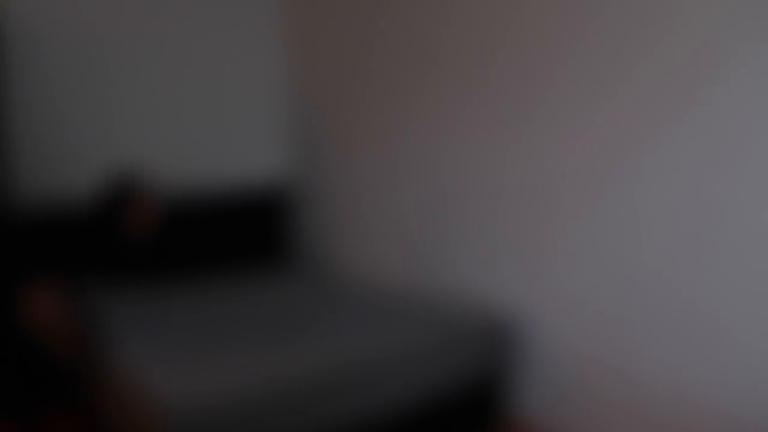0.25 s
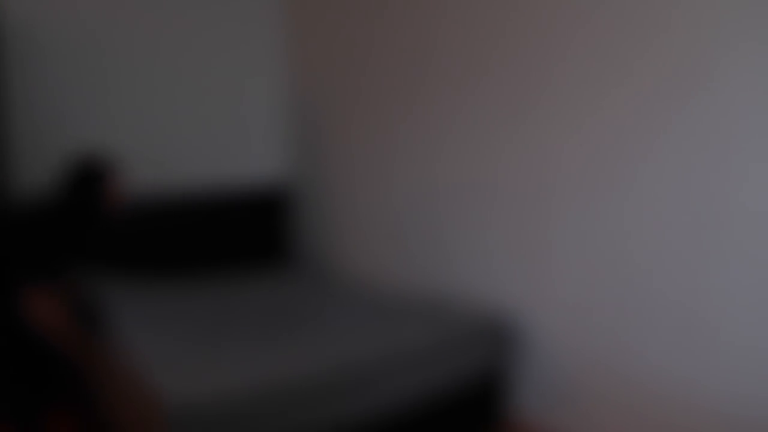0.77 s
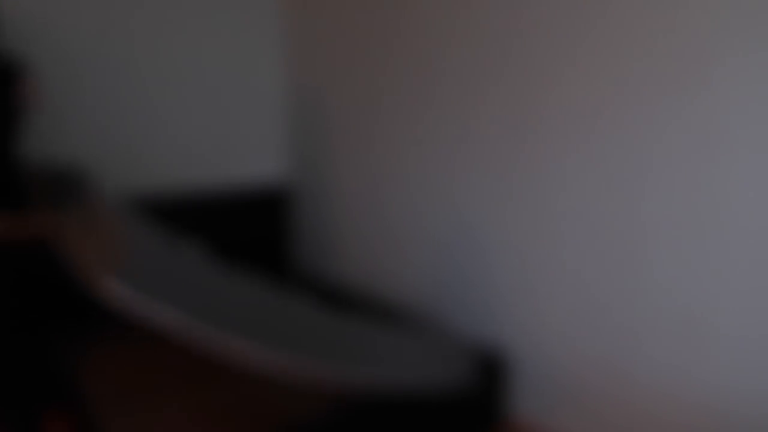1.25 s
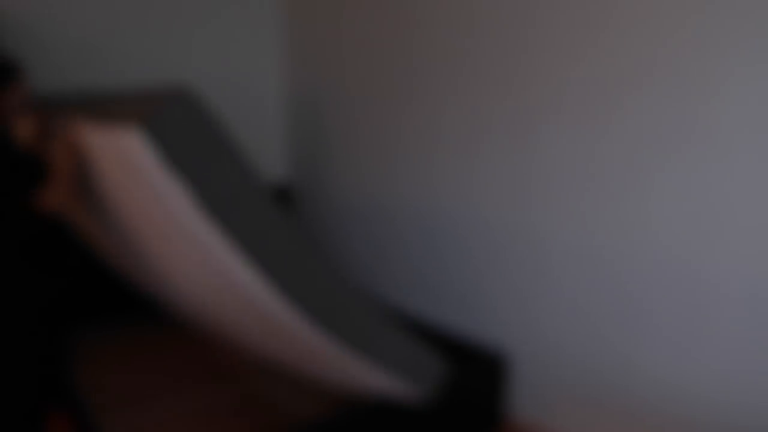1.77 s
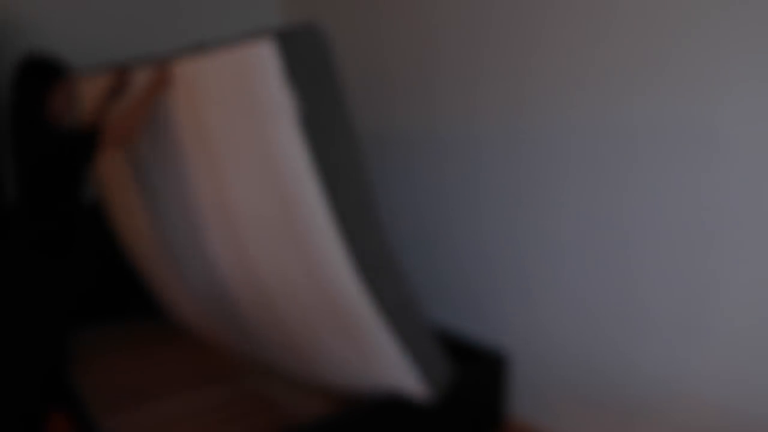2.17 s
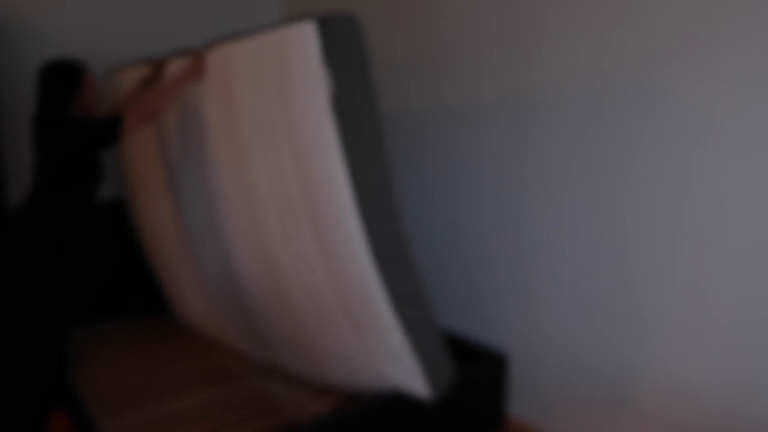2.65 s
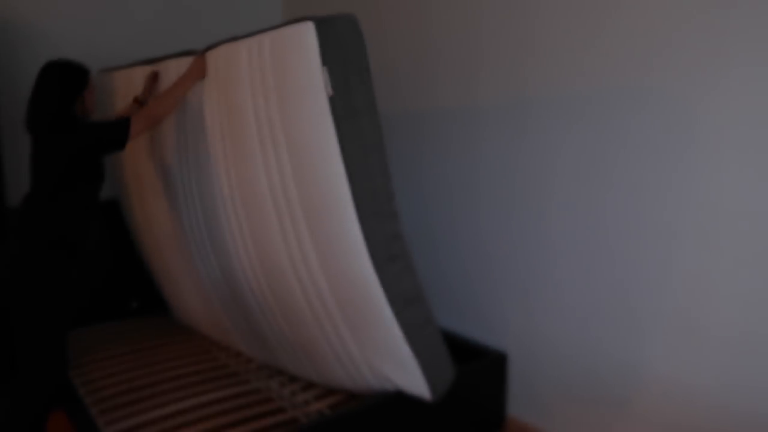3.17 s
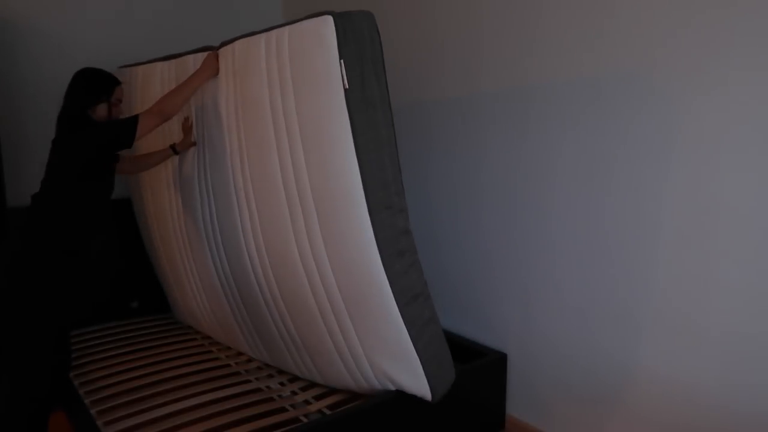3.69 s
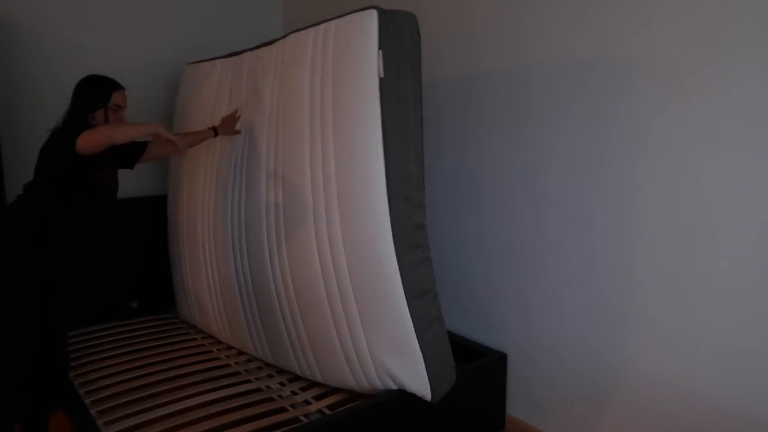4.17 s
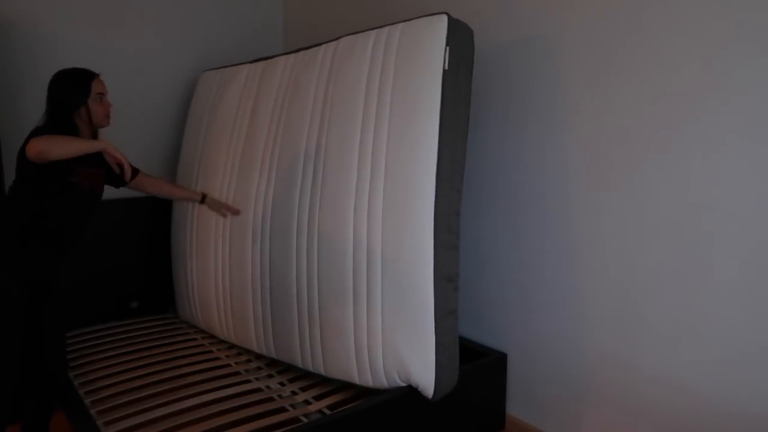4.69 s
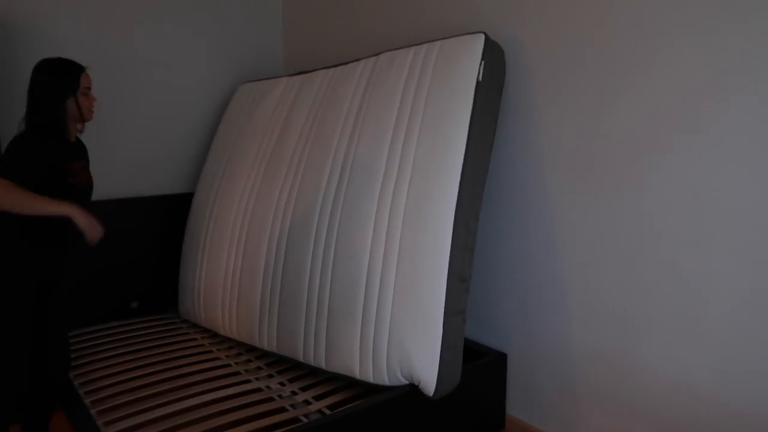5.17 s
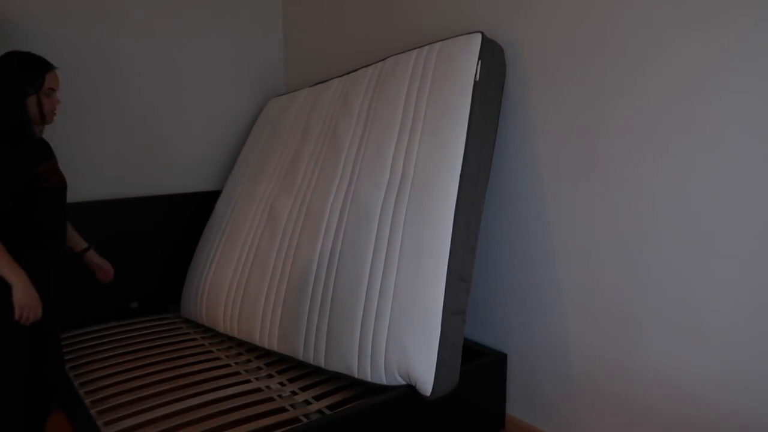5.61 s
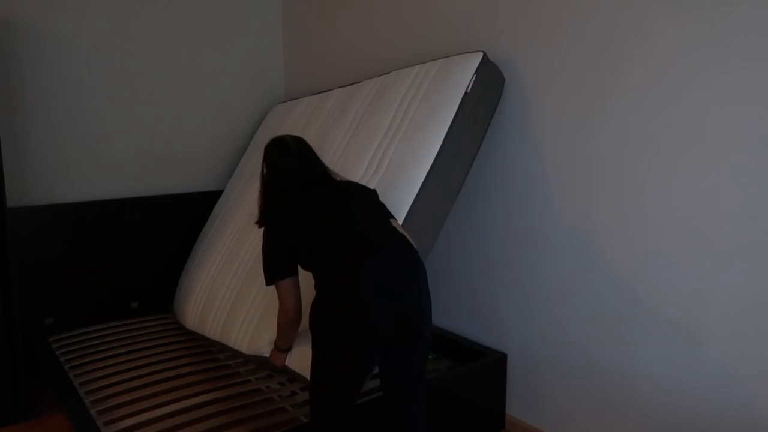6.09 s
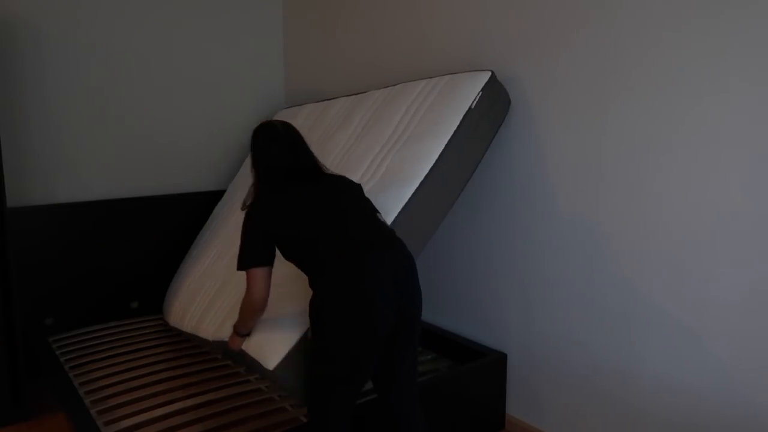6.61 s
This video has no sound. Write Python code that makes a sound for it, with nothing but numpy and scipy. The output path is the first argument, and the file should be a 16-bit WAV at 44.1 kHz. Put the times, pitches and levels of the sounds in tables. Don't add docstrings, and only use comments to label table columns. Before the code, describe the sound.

A mattress is hauled up off a slatted wooden bed, cover rustling, slats clattering loudly, springs pinging faintly, then it slides and tips in a small room.

```python
import sys
import numpy as np
from scipy import signal
from scipy.fft import rfft, irfft
from scipy.io import wavfile

SR = 44100
rng = np.random.default_rng(int(sys.argv[2]) if len(sys.argv) > 2 else 0)


def generate_wav(sig):
    pcm = np.round(np.clip(np.atleast_2d(sig).T, -1, 1) * 32767).astype(np.int16)
    wavfile.write(sys.argv[1], SR, pcm)


def voltage_ratio(level):
    return 10 ** (np.asarray(level, float) / 20)


N = 302085
TIME = np.arange(N) / SR

# [f/Hz, level/dB]
PORTS_BED = [(60, -32), (120, -43), (240, -25), (480, -16.5), (950, -15), (1890, -19), (3770, -9),
             (7520, -0.5), (15000, 6.5)]


def rms_one(x):
    return x / np.sqrt(np.mean(x ** 2) + 1e-20)


def while_moving(rows, rest_db=-150):
    s, db, rise, fall = np.transpose(rows)[:, :, None]
    t = np.arange(0, N + 32, 32) / SR
    before_peak = (s - t) / np.maximum(rise, 0.002)
    after_peak = (t - s) / np.maximum(fall, 0.002)
    down_db = 20 * np.maximum(before_peak, after_peak)
    power = np.sum(voltage_ratio(db - down_db) ** 2, axis=0) + voltage_ratio(rest_db) ** 2
    return np.interp(TIME, t, np.sqrt(power))


def rfft_hz(size):
    return np.arange(size // 2 + 1) * SR / size


def at_hz(points, hz):
    points = np.array(points)
    return np.interp(np.log(hz + 1), np.log(points[:, 0] + 1), points[:, 1])


def colour(x, points):
    size = x.shape[-1]
    return irfft(rfft(x) * voltage_ratio(at_hz(points, rfft_hz(size))), size)


def band(x, low_hz, high_hz):
    return signal.sosfilt(signal.butter(2, [low_hz, high_hz], "band", fs=SR, output="sos"), x)


def soften(x, hz):
    return signal.sosfilt(signal.butter(2, min(hz, 18000), fs=SR, output="sos"), x)


def resonate(x, hz, width_hz):
    r = np.exp(-np.pi * width_hz / SR)
    feedback = [1, -2 * r * np.cos(2 * np.pi * hz / SR), r * r]
    return signal.lfilter([(1 - r * r) / 2, 0, (r * r - 1) / 2], feedback, x + 1e-18)


def drift(rate_hz):
    knots = rng.standard_normal(int(N / SR * 200) + 400)
    r = np.exp(-2 * np.pi * rate_hz / 200)
    slow = signal.lfilter([1], [1, -2 * r, r * r], knots)[398:]
    return np.interp(TIME * 200, np.arange(len(slow)), rms_one(slow))


def port_pair(ports, grain=1):
    mid, side = rng.standard_normal((2, N)) * grain
    return np.array([mid, colour(side, ports)])


def rub_gains():
    # [t/s of the peak, level/dB, rise/s by 20 dB, fall/s by 20 dB, brightness/dB]
    slides = [(0.01, -57.5, 2, 0.14, 0), (0.45, -44, 0.14, 0.23, -9), (0.67, -58, 0, 0.1, 2),
              (1.0, -54.5, 0.22, 2.7, 10), (1.36, -45.5, 0.46, .5, 1.5), (1.52, -43.5, 0.49, .5, 5.5),
              (1.84, -49, 0.35, 0.26, 9), (1.7, -53, 0.63, .5, 10.5), (1.95, -50, 0.43, 0.2, 11),
              (2.24, -53.5, 0.7, 0.23, 8), (2.38, -32.5, 0.05, 0.1749, -17), (3.72, -58, 0.5, 2.5, 0),
              (4.38, -61.5, 1, 0.2, 8), (4.68, -61.5, 0.05, 0.7, 7), (4.87, -52.5, 0.32, 0.25, -10),
              (5.2, -61, 0.4, 5, -4), (5.4, -49.5, 0.42, 0.37, -3.5), (5.641, -47, 0.58, 0.07, 1),
              (5.86, -48, 0.1, 0.17, -1.5), (5.97, -56.5, 0.2, -0.14, 7), (6.5, -49.5, 0.33, 11, 0),
              (6.629, -36, 0.1859, 0.1, 1.5), (6.712, -31.5, 0.1, 0.3, -2), (6.82, -38.5, 0.3943, 1, 6)]
    # [t/s, level/dB, fall/s by 20 dB, brightness/dB]
    catches = [(0.324, -54, 0.2, 4), (0.402, -57, 0.6, -7), (0.89, -53.5, 0, -1), (1.19, -46, .5, 5.5),
               (1.928, -34, 0.13, -6), (2.04, -44, 0.26, -7), (2.152, -43.5, 0.24, -2),
               (2.318, -48.5, 0.0749, 12.5), (2.375, -43, 0.0727, 12), (2.83, -62.5, 0.77, 5.5),
               (3.32, -52, 0.05, -22), (3.51, -58.5, 0.4, -3), (3.786, -42.5, 0.22, -7),
               (4.27, -60, -0.5, 4), (4.46, -56.5, .4, -2), (4.79, -45, 0.1, -5), (5.49, -47, 0.4, 0.5),
               (6.141, -47, 0.8, 2.5)]
    # [t/s, level/dB, rise/s, fall/s]
    heaves = [
        (0.36, -48.5, 0.1, 0.33),
        (0.9, -52, 0.62, 0.33),
        (1.38, -48.5, .6, 0.37),
        (2.12, -42, .15, 0.16),
        (4.64, -55, 0.5, .3),
        (4.79, -50, 0.026, 0.11),
        (5.39, -39, 0.02, 0.16),
        (5.72, -49, 0.055, 0.32),
        (6.65, -37, 0.13, 0.33),
        (6.84, -31.5, 0.082, .3),
    ]
    catch_rise_s = 0.023
    sudden = [(s, db, catch_rise_s, fall, bright) for s, db, fall, bright in catches]
    s, db, rise, fall, bright_db = np.transpose(slides + sudden)
    weight_db = -53.5 + 0.61 * (db + 50)
    weight = np.vstack([heaves, np.transpose([s, weight_db, rise, fall])])
    rub_db = db - 3.5
    rustle_db = db - 9.5 + bright_db
    fibre_db = db - 19 + 1.31 * bright_db
    gains = [while_moving(weight, rest_db=-58.5)]
    for part_db in (rub_db, rustle_db, fibre_db):
        gains.append(while_moving(np.transpose([s, part_db, rise, fall])))
    return gains


def cover():
    # [f/Hz, level/dB per Hz]
    cloth_spectrum = [(60, -22), (110, 0.5), (300, -2), (700, -6), (1400, -6), (2400, -6.5), (4000, -11.5),
                      (6000, -17.5), (12500, -32.5), (15500, -36)]
    centre_hz = [330, 1600, 4200, 9500]
    slips = voltage_ratio(1.37 * rng.exponential(1, N))
    cloth = colour(port_pair(PORTS_BED, slips), cloth_spectrum)
    together = drift(16)
    out = 0
    for k, (gain, patchy_db) in enumerate(zip(rub_gains(), [1.78, 1.45, 0.7, 0.93])):
        share = np.interp(np.log(rfft_hz(N) + 1), np.log(centre_hz), np.arange(4) == k)
        part = irfft(rfft(cloth) * share, N)
        patches = np.minimum(0.7 * together + drift(22), 2)
        out = out + part / np.std(part[0]) * gain * voltage_ratio(patchy_db * patches)
    return out


def slats():
    # [t/s of the peak, clatter level/dB, rise/s, fall/s]
    shakes = [(0.405, -33.5, .012, 0.21), (1.922, -20.5, 0.016, 0.14), (2.034, -24, 0.015, 0.1),
              (2.16, -29.5, 0.017, 0.14), (2.327, -19, 0.016, 0.16), (2.39, -18, 0.097, 0.15),
              (2.44, -23, 0.098, 0.078), (3.786, -33.5, .016, .12), (5.398, -37, 0.046, 0.032),
              (5.476, -38, 0.017, 0.2), (6.505, -53, 0.036, .1), (6.582, -36, 0.027, 0.33),
              (6.722, -25.5, 0.28, .09), (6.836, -30, .055, .2)]
    # [f/Hz, width/Hz, level/dB]
    slat_modes = [(142.4, 21, -8), (214, 35, 0), (271, 73, 2.5), (355, 39, -2.5), (422, 77, 2),
                  (483, 99, 4), (640, 57, -4), (764, 27, -7), (856, 66, -4), (963, 89, -4),
                  (1020, 100, -24), (1370, 200, -29), (1800, 400, -33), (3020, 1900, -5)]
    hits_per_s = 900.0
    hits = rng.random(N) < hits_per_s / SR
    strength = voltage_ratio(2.3 * np.minimum(rng.exponential(1, N), 3))
    force = hits * strength * np.sqrt(SR / hits_per_s) * while_moving(shakes)
    rings = 0
    for hz, width, db in slat_modes:
        ring = resonate(force * rng.standard_normal(N), hz, width)
        rings = rings + voltage_ratio(db) * np.sqrt(SR / width) / 30 * ring
    return voltage_ratio(3.5) * soften(rings, hz=3340)


def knocks():
    # [t/s, level/dB, body f/Hz, crack level/dB relative to that level, length/s]
    knock_table = [(0.399, -33, 234, -15, 0.024), (1.919, -13, 540, -26, 0.011),
                   (2.038, -20.5, 405, -32, 0.0077), (2.146, -25, 600, -24, 0.023),
                   (2.32, -18.5, 323, -19, 0.011), (2.324, -24, 610, -27, 0.011),
                   (2.34, -12, 490, -28, 0.0075), (2.37, -11, 670, -9, 0.01), (2.376, -9, 625, -16, 0.008),
                   (2.417, -15, 332, -34, 0.0072), (2.447, -27, 372, -24, 0.009),
                   (3.786, -34, 161, -1, 0.0062), (3.843, -38.5, 382, -26, 0.0075),
                   (3.955, -36, 334, -29, 0.008), (4.255, -43, 403, 2, 0.012),
                   (4.784, -44, 3900, -38, 0.015), (5.384, -43, 515, -17, 0.012),
                   (5.394, -27.5, 248, -24, 0.01), (5.482, -30, 204, -3.5, 0.025),
                   (5.747, -33, 159, -33, 0.017), (6.074, -40.5, 213, -34, 0.012),
                   (6.126, -43.5, 194, 6, 0.016), (6.575, -33, 149, -7, 0.032), (6.71, -23, 235, -3, 0.028)]
    crack_hz = 1760
    out, t = np.zeros(N + 8192), np.arange(8192) / SR
    for s, db, body_hz, crack_db, length in knock_table:
        soft, hard = rng.standard_normal((2, 8192))
        fade = np.exp(-t / max(length, 0.002)) * np.minimum(t / 0.0018, 1)
        body = resonate(soft * fade, body_hz, 0.28 * body_hz)
        crack = resonate(hard * fade, crack_hz, 1.4 * crack_hz)
        body = voltage_ratio(-7.0) * body / np.abs(body).max()
        crack = voltage_ratio(crack_db) * crack / np.abs(crack).max()
        at = round(s * SR)
        out[at:at + 8192] += voltage_ratio(db - 2) * (body + crack)
    return soften(out[:N], hz=6000)


def taps(rows, rise_s):
    out, u = np.zeros(N + 4096), np.arange(4096) / SR / rise_s
    swell = (u * np.exp(1 - u)) ** 2
    for s, db, hz in rows:
        at = round((s - rise_s) * SR)
        out[at:at + 4096] += voltage_ratio(db + 0.4) * swell * np.sin(2 * np.pi * hz * u * rise_s)
    return out[:N]


def slat_taps():
    # [t/s of the peak,
    # level/dB, f/Hz]
    slat_notes = [(1.929, -34, 865), (1.93, -32.2, 651), (1.933, -30.3, 172), (1.936, -25.5, 475),
                  (1.938, -35, 956), (1.944, -27.5, 388), (1.949, -33.5, 204), (1.955, -32.5, 640),
                  (1.96, -31.1, 205), (1.962, -33, 523), (1.966, -34, 290), (1.98, -29.5, 180),
                  (1.995, -37, 376), (2.039, -32, 260), (2.043, -26.9, 432), (2.047, -40, 904),
                  (2.052, -35, 181), (2.056, -33.1, 269), (2.058, -29.8, 457), (2.078, -40, 193),
                  (2.09, -35.5, 398), (2.108, -41, 413), (2.108, -34, 204), (2.128, -41, 393),
                  (2.149, -39, 452), (2.153, -35, 627), (2.162, -34.5, 833), (2.164, -41, 430),
                  (2.169, -35, 150), (2.169, -35, 518), (2.17, -36, 325), (2.192, -36, 378), (2.206, -43, 360),
                  (2.22, -39.5, 202), (2.222, -36, 441),
                  (2.316, -39, 534), (2.321, -32.5, 301), (2.329, -27.5, 585), (2.333, -35.5, 1033),
                (2.34, -23, 324), (2.344, -25.0, 796), (2.35, -24.5, 462), (2.352, -39, 979),
                (2.369, -28, 890), (2.368, -23.3, 354), (2.371, -27, 650), (2.38, -27, 737),
                (2.381, -26, 928), (2.381, -21.5, 475), (2.385, -31.0, 1050), (2.389, -22.5, 326),
                (2.394, -31, 678), (2.401, -31, 886), (2.402, -23.5, 375), (2.407, -33.5, 753),
                (2.413, -27, 637), (2.42, -22, 350), (2.429, -28.5, 480), (2.432, -33, 700),
                (2.435, -28.5, 572), (2.435, -28, 207), (2.442, -27.5, 354), (2.446, -29, 576),
                (2.452, -25, 374), (2.469, -34.5, 568), (2.48, -32, 387), (2.485, -38, 217),
                (2.486, -38.9, 694), (2.489, -36.5, 303), (2.491, -40, 600), (2.493, -36, 441),
                (2.509, -40, 276), (2.512, -39.5, 407), (2.521, -37, 326),
                  (0.406, -41.4, 616), (0.414, -39.5, 393), (0.416, -35, 243), (0.419, -39.4, 470),
                (0.435, -38, 236), (0.468, -41, 866), (0.478, -39, 213), (0.5, -39, 276),
                (0.527, -38.5, 204), (0.555, -40.5, 201), (3.789, -43.5, 602), (3.791, -40.5, 150),
                (3.792, -43.6, 333), (3.792, -40.5, 1012), (3.804, -41, 452), (3.853, -42.2, 412),
                (3.962, -37, 370), (5.386, -44, 520), (5.397, -39, 213), (5.398, -38.5, 398),
                (5.404, -44, 553), (5.417, -38, 161), (5.443, -42, 192), (5.482, -37.5, 204),
                (5.516, -37.5, 149), (5.528, -44, 290), (5.554, -42.3, 204), (5.756, -40.5, 161),
                (5.767, -42.5, 256), (6.805, -33.5, 172), (6.832, -28.1, 284), (6.844, -32, 193)]
    return taps(slat_notes, rise_s=0.007)


def holder_snaps():
    # [t/s, level/dB]
    snaps = [
        (4.7825, -36),
        (4.7915, -45),
        (4.806, -46.5),
    ]
    # [f/Hz, level/dB, time to fall 60 dB/s]
    holder_modes = [(205, -7.5, 0.066), (850, -1.5, 0.1), (1028, -3.5, 0.092), (2154, 1, 0.051),
                    (2700, -12, .08), (3063, -9.5, .03), (3994, -14, 0.054), (4387, -15.5, .07)]
    out, t = np.zeros(N), np.arange(8192) / SR
    for s, db in snaps:
        ring = 0
        for hz, level_db, t60 in holder_modes:
            own_db = rng.normal(0, 2.2)
            ring = ring + voltage_ratio(level_db + own_db - 60 * t / t60) * np.sin(2 * np.pi * hz * t)
        at = round(s * SR)
        out[at:at + 8192] += voltage_ratio(db) * ring * np.minimum(t / 0.0013, 1)
    return out


def scuffs():
    # [t/s, peak level/dB, f/Hz, width/Hz, length/s]
    scuff_table = [(0.317, -50, 2280, 2000, 0.047), (1.523, -37, 2500, 1500, 0.039),
                   (3.788, -39, 2700, 1100, 0.0076), (0.79, -42, 410, 140, 0.028),
                   (1.216, -39, 590, 303, 0.022), (1.33, -38, 202, 74, 0.02), (2.148, -35, 1300, 900, 0.03),
                   (2.31, -35, 550, 497, 0.015), (3.317, -44, 1300, 300, 0.013),
                   (2.315, -32, 5700, 3000, 0.014), (2.845, -56, 4700, 3300, 0.047),
                   (3.311, -40, 2100, 1040, 0.027), (3.77, -34.5, 3200, 1800, 0.0084),
                   (4.8, -49, 4800, 2500, 0.0085), (4.46, -46, 2360, 1500, 0.02),
                   (1.921, -29, 1200, 1500, .004), (.4, -38, 1300, 1500, .008),
                   (3.953, -41, 500, 500, .025), (3.783, -41, 1600, 900, .01),
                   (4.654, -48.5, 5000, 4000, 0.019), (5.488, -46, 9600, 1500, .012),
                   (5.4, -47, 3600, 1700, 0.045), (5.96, -44, 3400, 1800, 0.046),
                   (5.1, -44, 2500, 1500, .05), (5.61, -51, 2600, 1500, 0.043),
                   (5.83, -50, 2200, 1500, .05), (2.368, -28, 1700, 3500, .012),
                   (.88, -47, 2000, 2000, 0.069)]
    out, t = np.zeros(N + 8192), np.arange(8192) / SR
    for s, db, hz, width, length in scuff_table:
        fade = np.minimum(t / 0.003, 1) * np.exp(-t / max(length, 0.002))
        burst = rng.standard_normal(8192) * fade
        catch = resonate(resonate(burst, hz, width), hz, width)
        at = round(s * SR)
        out[at:at + 8192] += voltage_ratio(db) * catch / np.abs(catch).max()
    return out[:N]


def springs(motions, modes, slips_per_s):
    slips = (rng.random(N) < slips_per_s / SR) * voltage_ratio(1.3 * drift(25))
    rings = 0
    for hz, width, db in modes:
        rings = rings + voltage_ratio(db) * rms_one(resonate(slips * rng.standard_normal(N), hz, width))
    return while_moving(motions) * voltage_ratio(-10.0) * soften(rings, hz=4500)


def spring_creaks():
    # [t/s of the peak, level/dB, rise/s, fall/s]
    low_moves = [(0.41, -41.5, 0.023, .2), (0.457, -44, 0.074, 0.14), (0.56, -60, 0.089, 0.22),
                 (4.795, -52, .012, .15), (4.9, -54, 0.13, 0.18), (5.0, -57, .03, 0.055)]
    high_moves = [(2.36, -36, .045, 0.15), (2.43, -34, 0.11, 0.082)]
    creak_moves = [(0.44, -35, 0.036, 0.086), (0.475, -43, .05, .07), (4.787, -42, 0.0087, .05),
                   (4.81, -54, .03, 0.19)]
    # [f/Hz, width/Hz, level/dB]
    low_modes = [(1480, 110, 5.4), (1665, 90, 2.2)]
    high_modes = [(1650, 41, -12), (1930, 85, 4.5), (1974, 20, 4.5), (2500, 80, -21), (3000, 85, -7)]
    creak_modes = [(620, 75, -5), (851, 90, -2), (980, 65, -10), (1180, 90, -9), (1760, 68, -5),
                   (2126, 120, -3), (2500, 130, -8), (3205, 52, -5.5), (3870, 130, -8.5)]
    low = springs(low_moves, low_modes, slips_per_s=700)
    high = springs(high_moves, high_modes, slips_per_s=1300)
    return low + high + springs(creak_moves, creak_modes, slips_per_s=800)


def spring_pings():
    # [t/s of the peak, level/dB, f/Hz]
    ping_table = [(0.441, -39, 1656), (0.442, -41.5, 1420), (0.458, -39, 1464), (0.469, -36, 1480),
                  (0.489, -37, 1468), (0.507, -38, 1507), (0.528, -49, 1496), (0.539, -50, 1520),
                  (0.541, -50.9, 1790), (0.571, -47, 1476), (0.649, -51, 1518), (4.869, -51, 1464),
                  (4.886, -53, 1555), (4.897, -53, 1485), (4.907, -50, 1460), (4.945, -52.9, 1485),
                  (4.999, -52.7, 1470)]
    return taps(ping_table, rise_s=0.006)


def free_coil():
    # [t/s of the peak, level/dB, rise/s, fall/s]
    coil_moves = [
        (2.362, -49, .04, .2),
        (2.48, -47, .12, 0.14),
    ]
    tone = np.sin(2 * np.pi * np.cumsum(1985 + 12 * drift(15)) / SR)
    return while_moving(coil_moves) * voltage_ratio(1.7 * drift(29.8)) * tone


def bedroom(x):
    # [f/Hz, time to fall 60 dB/s]
    walls = [(100, 0.33), (300, 0.28), (1000, 0.21), (3000, 0.26), (7000, 0.35), (12000, 0.094)]
    t = np.arange(SR // 2) / SR
    white = port_pair(PORTS_BED)[:, :len(t)]
    edges = 60 * 2.0 ** np.arange(9)
    tail = 0
    for low, high in zip(edges, edges[1:]):
        t60 = at_hz(walls, np.sqrt(low * high))
        tail = tail + band(white, low, high) * voltage_ratio(-60 * t / t60)
    tail = tail * np.clip((t - 0.003) / 0.0051, 0, 1)
    tail = voltage_ratio(-6) * tail / np.sqrt(np.sum(tail[0] ** 2))
    tail[0, 0] = 1
    return signal.fftconvolve(x[None], tail, axes=1)[:, :N]


def drone():
    note_hz = [97, 150.7]
    # [t/s, level/dB]
    low_swells = [
        (0.52, -49),
        (1.93, -48),
        (2.05, -50),
        (2.41, -50),
        (6.84, -52),
    ]
    # [t/s, level/dB]
    upper_note = [(0, -56.5), (0.93, -54), (1.2, -57), (1.6, -53.5), (1.8, -56), (2.27, -55), (2.44, -50),
                  (2.65, -57.5), (3.1, -60.5), (3.43, -75), (3.79, -63), (4.48, -61.5), (4.7, -69),
                  (5.2, -60.5), (5.5, -55), (6.4, -59.5), (6.72, -45), (6.85, -52)]
    # [t/s, level/dB]
    thud_table = [(0.05, -55), (0.36, -50.5), (0.7, -51), (0.9, -57), (1.38, -50.5), (1.56, -50),
                  (1.76, -51), (2.3, -56), (2.5, -50), (3.5, -66), (3.8, -50), (4.42, -55), (4.7, -62),
                  (5.46, -48), (5.8, -54), (6.201, -51.5), (6.5, -51), (6.8, -43)]
    throb = 1 - 0.29 * np.cos(2 * np.pi * (TIME - 3.3) / 0.3357)
    low = throb * while_moving([(s, db, 0.068, 0.16) for s, db in low_swells], rest_db=-55)
    upper = voltage_ratio(np.interp(TIME, *np.transpose(upper_note)))
    notes = 0
    for hz, gain in zip(note_hz, [low, upper]):
        waver = voltage_ratio(3.5 + 1.1 * drift(3.5))
        notes = notes + gain * waver * np.sin(2 * np.pi * np.cumsum(hz + 1.51 * drift(4.24)) / SR)
    thuds = while_moving([(s, db, 0.33, 0.4) for s, db in thud_table], rest_db=-65)
    return notes + thuds * rms_one(band(rng.standard_normal(N), low_hz=30, high_hz=70))


def background():
    # [f/Hz, level/dB]
    ports_air = [(60, -37), (130, -3), (290, 7), (640, -1.5), (1410, 0), (3100, 1), (6820, 3), (15000, 2)]
    # [f/Hz, level/dB per Hz]
    air_spectrum = [(15, -18), (30, -10.5), (50, -9), (75, -18), (120, -16.5), (260, -22), (400, -18.5),
                    (520, -22), (900, -19.5), (1300, -24), (4000, -31.5), (12700, -46.5), (15500, -54)]
    # [f/Hz, width/Hz, level/dB]
    hum_modes = [(194, 6.1, -63.5), (394.8, 38, -63.5), (421, 31, -67)]
    # [f/Hz, level/dB]
    whine_tones = [(13001, -80), (13028, -82)]
    air = colour(port_pair(ports_air), air_spectrum)
    air = air * voltage_ratio(-49 - 8) / np.std(air[0])
    air[0] += drone()
    white = rng.standard_normal(N + SR)
    for hz, width, db in hum_modes:
        hum = resonate(resonate(white, hz, width), hz, width)[SR:]
        air[0] += voltage_ratio(db) * rms_one(hum)
    for hz, db in whine_tones:
        air[0] += voltage_ratio(db) * np.sin(2 * np.pi * hz * TIME)
    return air


def scene():
    single = slat_taps() + spring_pings() + holder_snaps()
    wet = 0.45
    in_room = wet * single + slats() + knocks() + scuffs() + spring_creaks()
    mid, side = bedroom(in_room) + cover() + background()
    mid = mid + free_coil() + (1 - wet) * single
    side = side + 0.03 * single
    return np.array([mid + side, mid - side]) * voltage_ratio([[0.15], [-0.15]])


def roll_off(x):
    return signal.sosfilt(signal.butter(12, 15610, fs=SR, output="sos"), x)


def record(dry):
    return roll_off(dry)


dry = scene()
out = record(dry)
generate_wav(out)
```